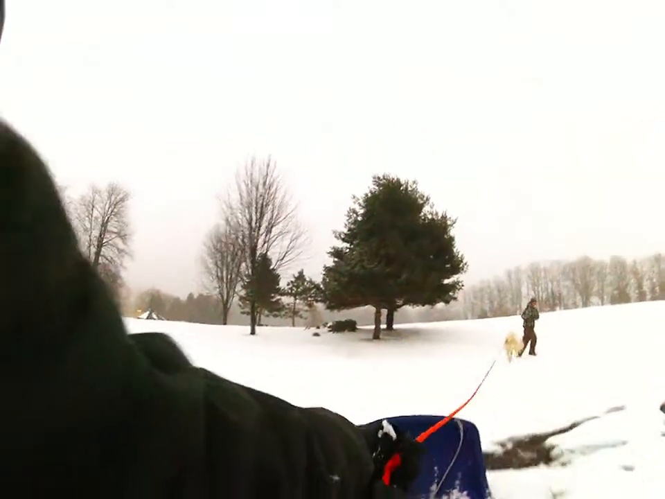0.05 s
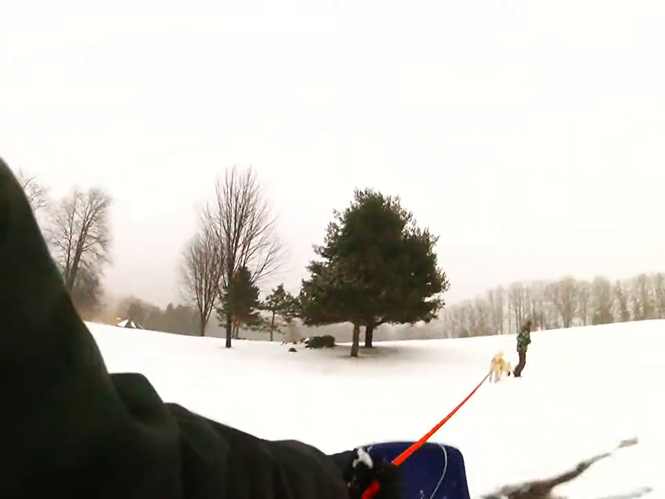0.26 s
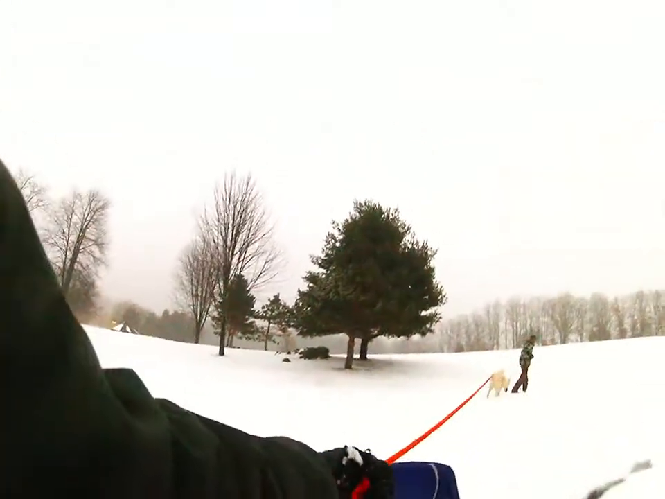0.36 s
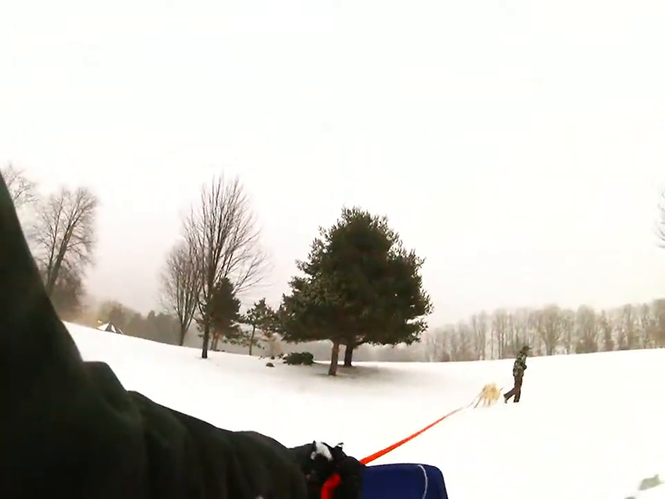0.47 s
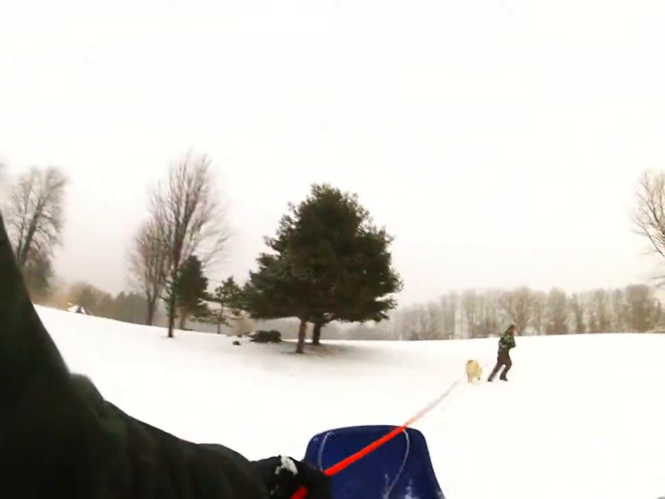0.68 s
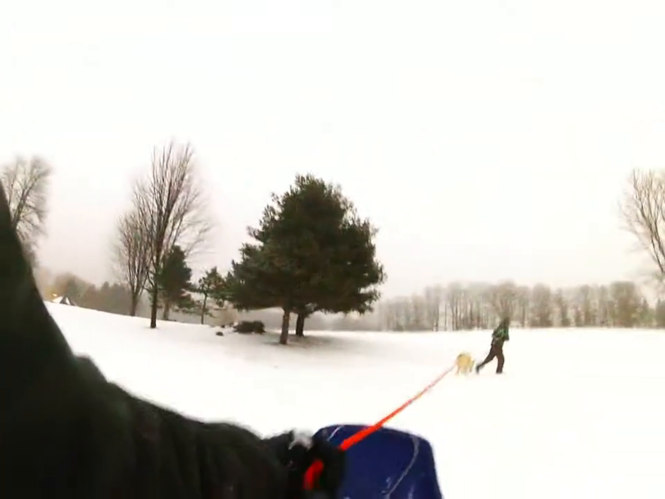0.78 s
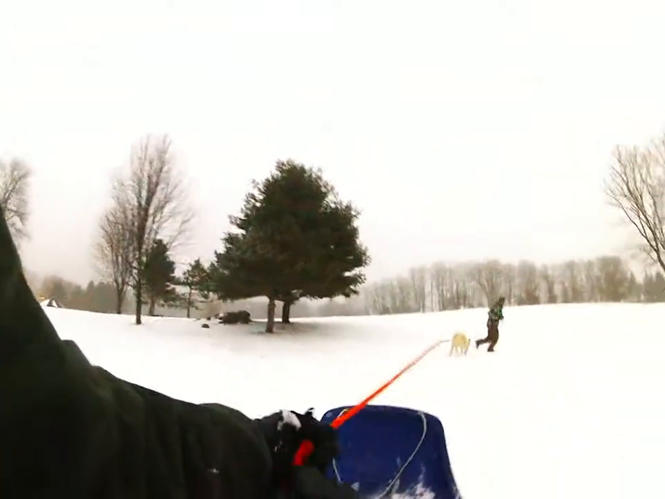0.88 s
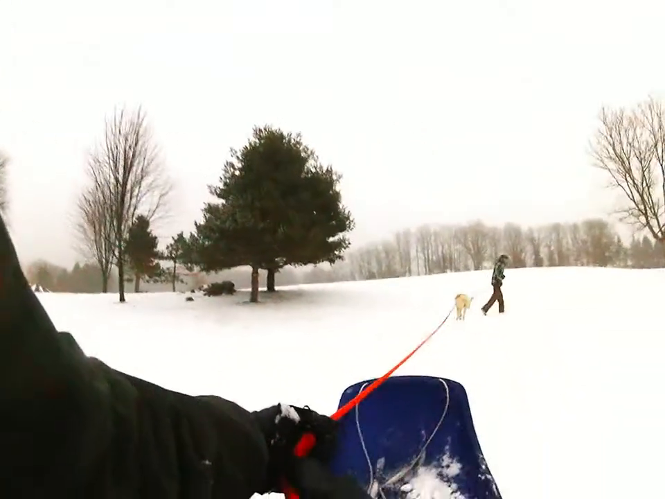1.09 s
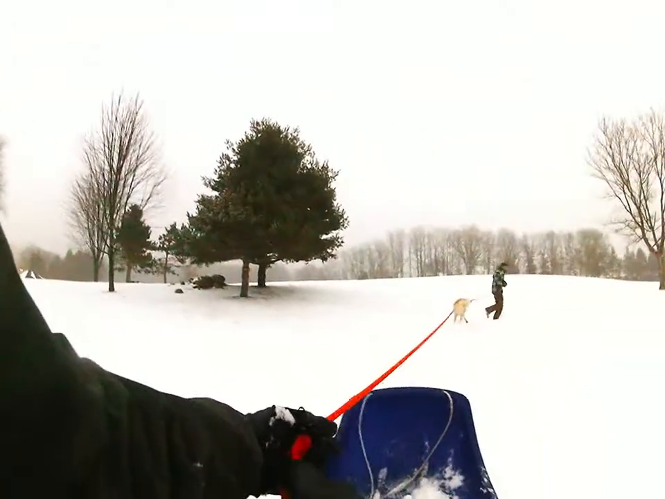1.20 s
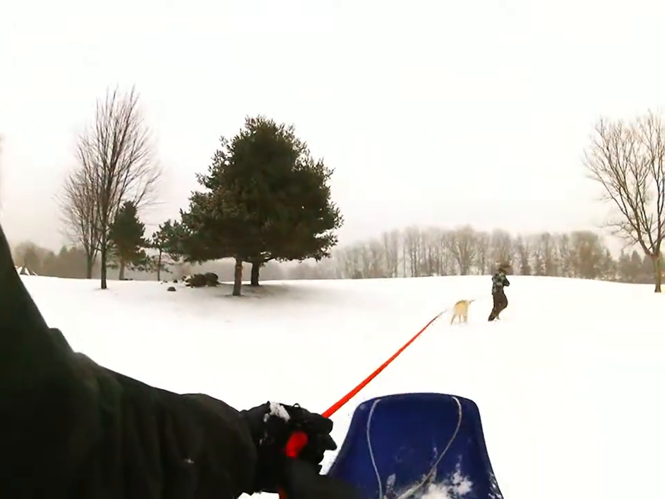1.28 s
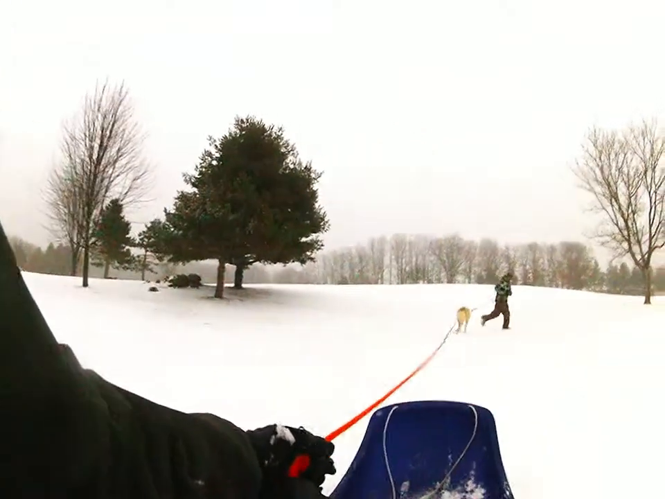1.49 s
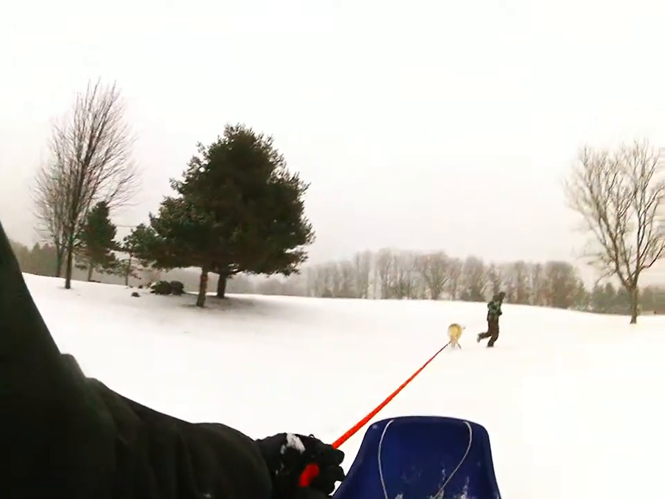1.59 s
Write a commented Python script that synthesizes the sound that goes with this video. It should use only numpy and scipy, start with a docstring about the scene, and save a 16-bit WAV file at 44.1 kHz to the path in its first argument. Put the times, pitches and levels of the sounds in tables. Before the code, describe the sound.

Plastic sled sliding on snow outdoors, with a loud crusty grind and hollow knocks partway through

```python
"""First a soft hiss under the rider: a plastic sled towed over soft snow, fine grains brushing its base.
Then it grinds over a crusty patch: breaking grains crackle, ring the shell wall and make the hollow hull drum.
Lumps knock on the hull, hard bits snap against the plastic, slabs give way and the base squeaks in short
tones, all as decaying modes, filtered grains or wavering sines. Filtered noise makes the rumble of moving air.
Open field, no echo; every source is close to one microphone, at the rider's place."""
import sys
import numpy as np
from scipy import signal
from scipy.fft import rfft, irfft
from scipy.io import wavfile
from scipy.ndimage import uniform_filter1d

SR = 44100
rng = np.random.default_rng(int(sys.argv[2]) if len(sys.argv) > 2 else 0)


def to_wav(sig):
    """Store sig (one row per channel, or 1-D mono) as 16-bit WAV at the path in sys.argv[1].

    Samples outside -1..1 are clipped; the rate is SR.
    """
    pcm = np.clip(np.atleast_2d(sig), -1, 1) * 32767
    pcm = np.round(pcm).astype(np.int16)
    wavfile.write(sys.argv[1], SR, pcm.T)  # frames by channels


N = 72765  # length in samples, 1.65 s


def undb(db):
    """Decibels to amplitude gain."""
    return 10 ** (np.asarray(db) / 20)


def unit(x):
    """Scale to rms 1."""
    return x / np.sqrt(np.mean(x ** 2))


def curve(rows):
    """Gain over time, interpolated in dB between (t/s, level/dB) rows."""
    times, db = np.array(rows).T
    return undb(np.interp(np.arange(N) / SR, times, db))


def walk(rate):
    """Random levels held for 1 / rate seconds, then slewed; rms 1."""
    step = (np.arange(N) * rate / SR).astype(int) % 2048
    held = rng.standard_normal(2048)[step]
    return unit(uniform_filter1d(held, max(int(SR / rate), 1)))


def through(x, response):
    """Play x through an impulse response."""
    return signal.fftconvolve(x, response)[:N]


def colour(x, points, size=8192):
    """Filter x to the (f/Hz, level/dB) shape with minimum phase; output rms 1."""
    hz, db = np.array(points).T
    f = np.maximum(np.arange(size // 2 + 1) * SR / size, 1)
    shape = undb(np.interp(np.log(f), np.log(hz), db))
    # folding the cepstrum onto positive time makes the filter causal
    cepstrum = irfft(np.log(shape))
    cepstrum[1:size // 2] *= 2
    cepstrum[size // 2 + 1:] = 0
    response = irfft(np.exp(rfft(cepstrum)))
    return unit(through(x, response))


def ring(modes, shorten=1, size=6000):
    """Impulse response of decaying modes; shorten scales each decay time."""
    t = np.arange(size) / SR
    response = np.zeros(size)
    for hz, db, t60 in modes:
        decay = np.exp(-np.log(1000) * t / (t60 * shorten))
        response += undb(db) * np.cos(2 * np.pi * hz * t) * decay
    return response


def grains(rate, spread_db):
    """Tiny impacts at random times, of random sign and uneven size."""
    happens = rng.random(N) < rate / SR
    sign = np.sign(rng.standard_normal(N))
    size = undb(spread_db * np.clip(rng.standard_normal(N), -2, 2))
    return happens * sign * size


def add(out, s, sound, db):
    """Place a sound at s seconds with its peak at db."""
    i = int(s * SR)
    out[i:i + len(sound)] += (undb(db) * sound / np.abs(sound).max())[:N - i]


# grinding of the crust under the base, before the two layer trims: t/s, level/dB
GRIND = [(0, -60), (.06, -62), (.11, -63.5), (.2, -60.5), (.255, -54), (.285, -64), (.39, -62),
         (.46, -52.5), (.481, -52.5), (.495, -46.5), (.535, -46), (.572, -51), (.63, -45.5), (.675, -46),
         (.70, -46), (.722, -41.5), (.748, -50), (.82, -52), (.97, -52.5), (1.02, -57.5), (1.07, -62.5),
         (1.1, -67.5), (1.65, -68)]
# colour of breaking crust: f/Hz, level/dB
CRUST = [(200, -13.5), (500, 2), (800, 2), (1200, 2.5), (1900, 1.5), (2800, -1), (4200, -13.5),
         (5200, -16.5), (7000, -13.5), (9800, -7), (11500, -14), (14500, -11.5), (16000, -14)]
# modes of the stiff shell wall: f/Hz, level/dB, t60/s
SHELL = [(1117, -3.5, .06), (1204, -4, 0.066), (1647, -7, 0.027), (1885, -1.5, 0.028), (2394, -5, 0.051),
         (3484, -7, 0.042), (3890, -2.5, .016)]
CRUST_PER_S, CRUST_SPREAD_DB = 5000, 3.5
JUDDER_PER_S, JUDDER_DB = 160, 1.5
CRUST_DB, SHELL_DB = -2.5, -3.5  # layer trims


def crust():
    """Ice grains break with a juddering level; they crackle and ring the shell wall."""
    breaks = grains(CRUST_PER_S, CRUST_SPREAD_DB) * undb(JUDDER_DB * walk(JUDDER_PER_S))
    crackle = undb(CRUST_DB) * colour(breaks, CRUST)
    wall = undb(SHELL_DB) * unit(through(breaks, ring(SHELL)))
    return (crackle + wall) * curve(GRIND)


# slabs giving way: start t/s, length to half release/s, level/dB (rms before envelope), dull above f/Hz
CRUNCHES = [(0.115, .012, -56.5, 800), (0.487, 0.0043, -37, 2440), (0.513, 0.026, -43.5, 4500),
            (0.605, 0.012, -47.5, 4000), (0.665, 0.024, -39, 2360), (0.708, 0.014, -38, 11500),
            (0.729, .011, -50, 12000), (0.757, 0.01, -49.5, 2000), (0.766, 0.031, -45, 1150),
            (1.365, 0.016, -62, 4000)]
CRUNCH_ATTACK_S, CRUNCH_RELEASE_S = 0.0012, 0.014
CRUNCH_PER_S, CRUNCH_SPREAD_DB = 14000, 1.5


def crunches():
    """A slab of crust collapses in a short, dense burst of grains, each dulled above its own corner."""
    out, t = np.zeros(N), np.arange(N) / SR
    crumble = colour(grains(CRUNCH_PER_S, CRUNCH_SPREAD_DB), CRUST)
    for s, length, db, dull_hz in CRUNCHES:
        attack = np.clip((t - s) / CRUNCH_ATTACK_S, 0, 1)
        release = np.clip((s + length - t) / CRUNCH_RELEASE_S + .5, 0, 1)
        muffle = signal.butter(2, min(dull_hz, .45 * SR), fs=SR, output="sos")
        out += undb(db) * attack * release * unit(signal.sosfilt(muffle, crumble))
    return out


# shaking of the hull by uneven ground, before the layer trim: t/s, level/dB
SHAKE = [(0.0, -60.5), (0.266, -51.5), (0.284, -60.5), (0.408, -52), (0.422, -47.5), (0.464, -47),
         (0.51, -31.5), (0.556, -49.5), (0.67, -32.5), (0.738, -34), (0.808, -45), (0.882, -52),
         (1.052, -52.5), (1.106, -64.5), (1.432, -69), (1.452, -55), (1.484, -85), (1.65, -56)]
# hollow modes of the hull: f/Hz, level/dB, t60/s (before any damping)
HULL = [(259, 11, 0.066), (285, 11.5, 0.026), (319.5, 10, 0.055), (370, 10.5, 0.041), (442, -4.5, 0.097),
        (477, -13, 0.032), (590, -21, 0.13), (645, -26, 0.012)]
LUMPS_PER_S, LUMP_SPREAD_DB, HULL_DB = 1200, -2, -3.5


def hull():
    """Small lumps pass under the sled and keep the hollow hull drumming."""
    drum = through(grains(LUMPS_PER_S, LUMP_SPREAD_DB), ring(HULL))
    band = signal.butter(2, [210, 620], "band", fs=SR, output="sos")
    drum = signal.sosfilt(band, drum)
    return undb(HULL_DB) * unit(drum) * curve(SHAKE)


# lumps that knock on the hull: t/s, peak level/dB, contact time/ms
KNOCKS = [(.119, -46.5, 0.4), (0.177, -55, 0.87), (.380, -42.5, 1.1), (0.4245, -33, 1.3), (0.43, -37, 2),
          (.450, -43, 2), (0.505, -30.5, 0.3), (.579, -35, 0.35), (.611, -30, 0.34), (0.682, -30, 0.42),
          (.733, -40, 1.8), (1.037, -36.5, 0.37), (1.067, -41.5, 0.69), (1.451, -40, 1.3)]
KNOCK_DAMPING, KNOCK_THUD_DB = 0.66, -10  # factor on the hull decay times; thud relative to the ring


def knocks():
    """A bigger lump gives one soft push: a thud and a damped ring of the hull."""
    out, body = np.zeros(N), ring(HULL, KNOCK_DAMPING)
    t = np.arange(len(body)) / SR
    for s, db, contact_ms in KNOCKS:
        age = t / (contact_ms / 1000 / np.pi)  # the push peaks at age 1
        push = age * np.exp(1 - age)
        boom = signal.fftconvolve(push, body)[:len(t)]
        add(out, s, boom / np.abs(boom).max() + undb(KNOCK_THUD_DB) * push, db)
    return out


# hard bits that snap against the shell: t/s, peak level/dB
SNAPS = [(.046, -44.5), (.205, -41), (0.4702, -25.5), (0.4709, -25), (0.4727, -30.5), (0.4744, -33),
         (1.067, -47), (1.452, -46)]
# ring of a snap: f/Hz, level/dB, t60/s
SNAP_RING = [(1152, -12.5, 0.06), (1620, -6, 0.012), (1922, 6.5, 0.012), (2500, 2, 0.0092),
             (3190, -6, 0.015), (3520, -5.5, 0.0034)]
# colour of the crack of a snap: f/Hz, level/dB
CRACK = [(300, -6), (1300, 11.5), (3400, 0), (4600, -20), (7200, -18), (8500, -2.5), (10000, 11),
         (11500, -10), (12800, -20), (14000, 9), (15500, -12)]
SNAP_CRACK_DB, SNAP_CRACK_S, SNAP_ATTACK_S = -5.5, 0.0022, 0.00044  # times are e-folding


def snaps():
    """A hard bit strikes the plastic: a brief crack and a short bright ring."""
    out, body = np.zeros(N), ring(SNAP_RING)
    t = np.arange(len(body)) / SR
    for s, db in SNAPS:
        noise = colour(rng.standard_normal(N), CRACK)[-len(t):]
        crack = undb(SNAP_CRACK_DB) * noise * np.exp(-t / SNAP_CRACK_S)
        attack = 1 - np.exp(-t / SNAP_ATTACK_S)
        add(out, s, (body + crack) * attack, db)
    return out


# squeaks on packed snow: t/s at the loudest, length/s, mean pitch f/Hz, level/dB (rms before swell)
SQUEAKS = [(.01, 0.025, 1166, -57), (.066, 0.027, 1160, -53.5), (0.248, 0.03, 1160, -55.5),
           (0.826, 0.018, 2464, -48.5), (0.906, 0.071, 2510, -52), (0.963, 0.049, 1810, -55),
           (.994, 0.012, 1140, -45)]
SQUEAK_WOBBLE, SQUEAK_WOBBLE_PER_S, SQUEAK_ROUGH_DB = .035, 300, 2  # wobble is a fraction of the pitch


def squeaks():
    """The base sticks and slips at a resonance of the shell: a brief, rough, wavering tone."""
    out, t = np.zeros(N), np.arange(N) / SR
    for s, length, hz, db in SQUEAKS:
        swell = np.cos(np.pi * np.clip((t - s) / length, -.5, .5))
        pitch = hz * (1 + SQUEAK_WOBBLE * walk(SQUEAK_WOBBLE_PER_S))
        phase = 2 * np.pi * np.cumsum(pitch) / SR
        rough = undb(SQUEAK_ROUGH_DB * walk(SQUEAK_WOBBLE_PER_S))
        out += undb(db) * swell * unit(np.sin(phase) * rough)
    return out


# hiss of the base on soft snow: t/s, level/dB
GLIDE = [(0, -56.5), (.24, -60.5), (.3, -64), (.45, -63), (.6, -59.5), (.9, -55.5), (1.05, -58),
         (1.25, -58.5), (1.5, -55), (1.65, -56.5)]
# colour of soft snow: f/Hz, level/dB
SOFT_SNOW = [(150, 4.5), (400, -1.5), (750, -11.5), (1300, -6.5), (2400, 1), (3000, 0.5), (3700, 3),
             (5000, -3.5), (7000, -5.5), (8300, -3), (10000, -12), (11500, -54), (14500, -8), (16000, -26)]
POWDER_PER_S, POWDER_SPREAD_DB = 18000, 3
FLUTTER_PER_S, FLUTTER_DB = 71, 0.86
POWDER_SHELL_DB = -8  # relative to the hiss


def powder():
    """Countless fine crystals brush the base: a slightly fluttering hiss and a faint ring of the shell."""
    brush = grains(POWDER_PER_S, POWDER_SPREAD_DB) * undb(FLUTTER_DB * walk(FLUTTER_PER_S))
    # only the higher shell modes ring here
    shell = unit(through(grains(POWDER_PER_S, POWDER_SPREAD_DB), ring(SHELL[3:])))
    return (colour(brush, SOFT_SNOW) + undb(POWDER_SHELL_DB) * shell) * curve(GLIDE)


# air on the microphone, before gusts and the layer trim: t/s, level/dB
WIND = [(0.0, -54.5), (0.114, -65), (0.132, -51), (0.17, -65.5), (0.22, -48), (0.33, -63), (0.574, -41.5),
        (0.592, -46), (0.744, -40.5), (0.9, -52.5), (0.968, -43.5), (1.01, -54), (1.102, -48.5),
        (1.24, -62.5), (1.276, -56), (1.65, -59)]
# colour of the air rumble: f/Hz, level/dB
AIR = [(10, -15.5), (25, 0.5), (42, -0.5), (70, -5), (120, -7), (200, -14), (400, -20.5), (1000, -87)]
GUST_PER_S, GUST_DB, WIND_DB = 27, 1, -1.5


def wind():
    """Gusty low rumble of air on the moving microphone."""
    gusts = undb(WIND_DB + GUST_DB * walk(GUST_PER_S))
    return gusts * colour(rng.standard_normal(N), AIR) * curve(WIND)


def scene():
    """All sources, close to one microphone."""
    return (crust() + crunches() + hull() + powder() + squeaks() + knocks() + snaps() + wind())[None]


# narrow dips of the recorder behind the microphone: centre f/Hz, width/Hz
NOTCHES = [(6000, 340), (12000, 580)]
TOP_HZ = 15200


def record(dry):
    """The recorder has two narrow dips in the treble and cuts the top."""
    for hz, width in NOTCHES:
        edges = [hz - width / 2, hz + width / 2]
        dry = signal.sosfilt(signal.butter(2, edges, "bandstop", fs=SR, output="sos"), dry)
    return signal.sosfilt(signal.ellip(8, .2, 70, TOP_HZ, fs=SR, output="sos"), dry)


dry = scene()
out = record(dry)
to_wav(out)
```